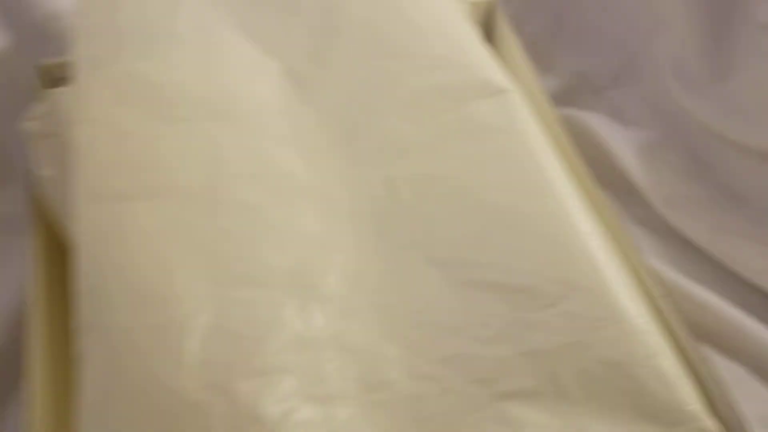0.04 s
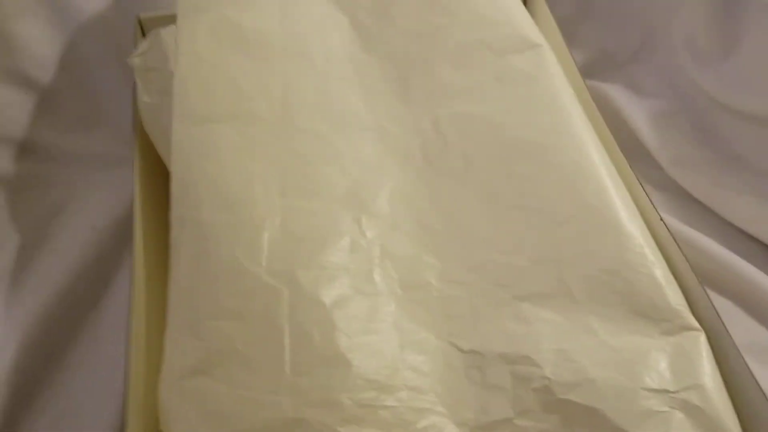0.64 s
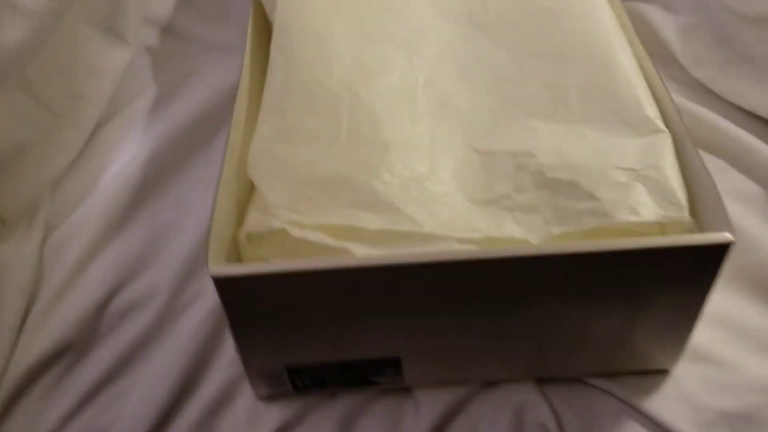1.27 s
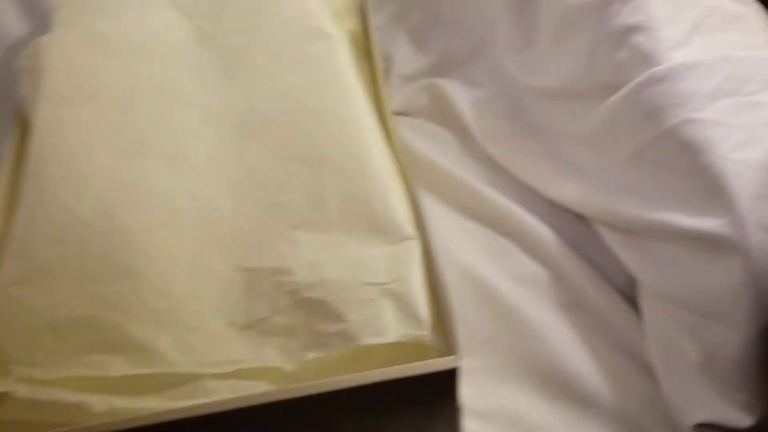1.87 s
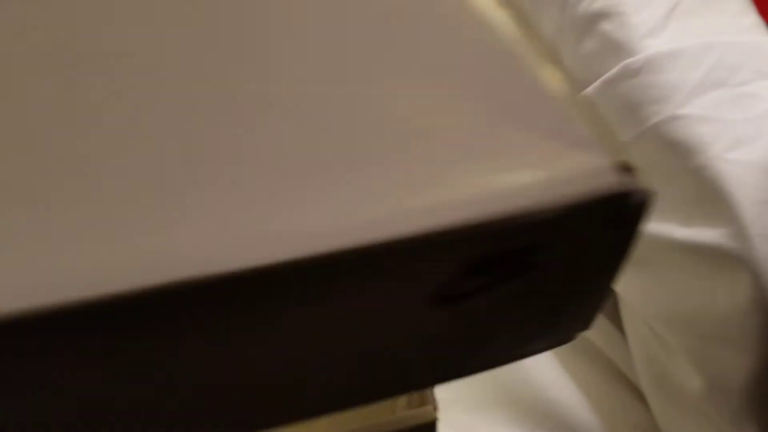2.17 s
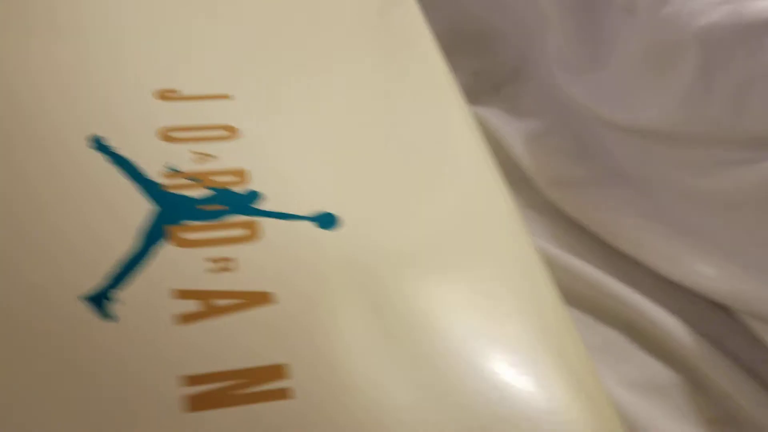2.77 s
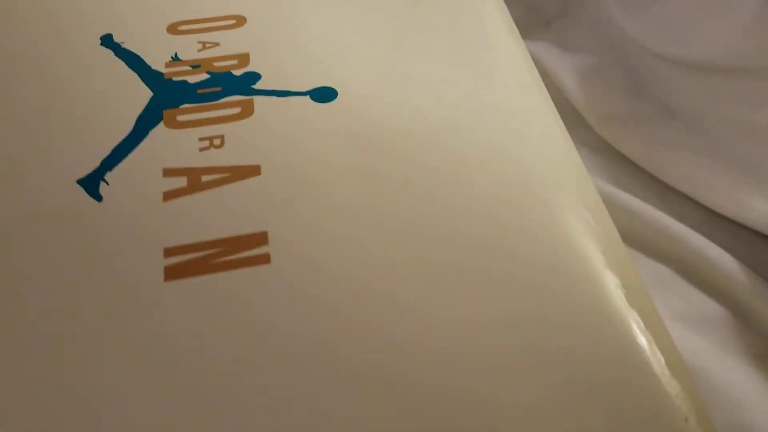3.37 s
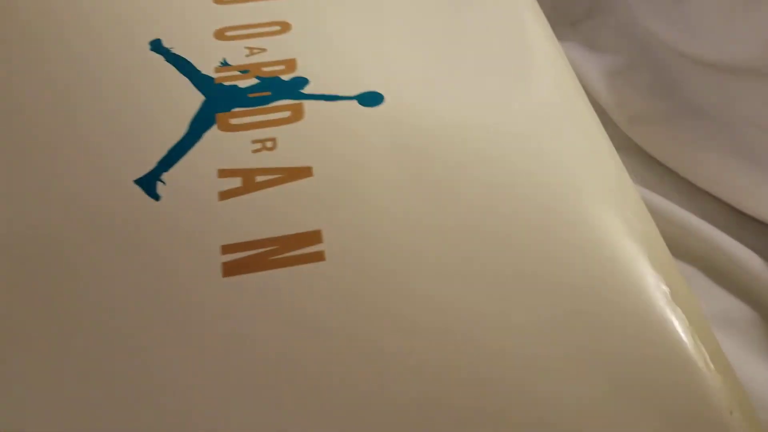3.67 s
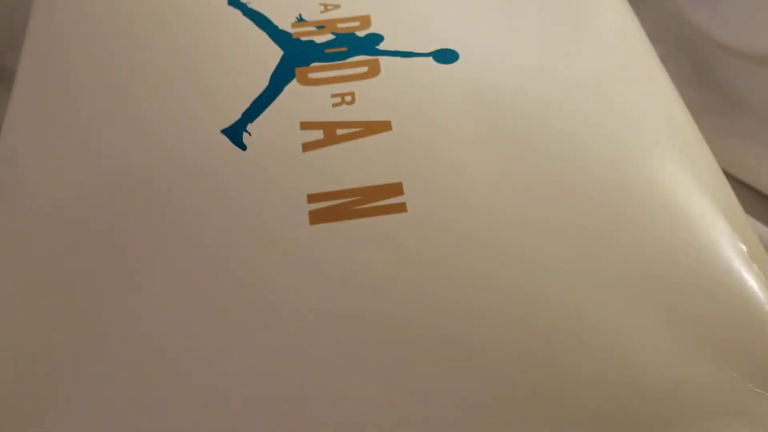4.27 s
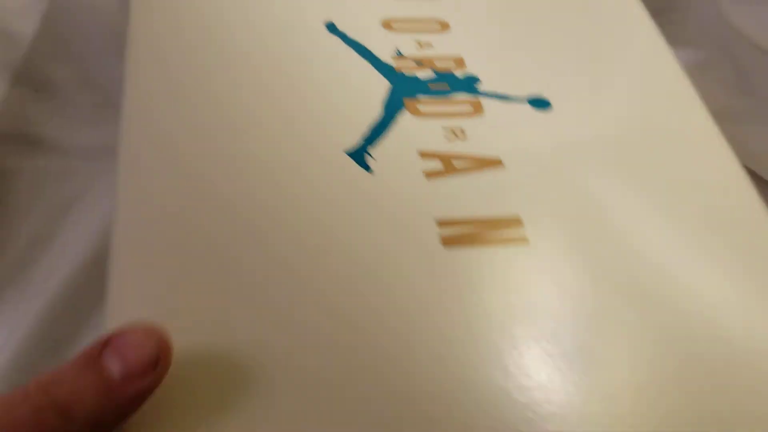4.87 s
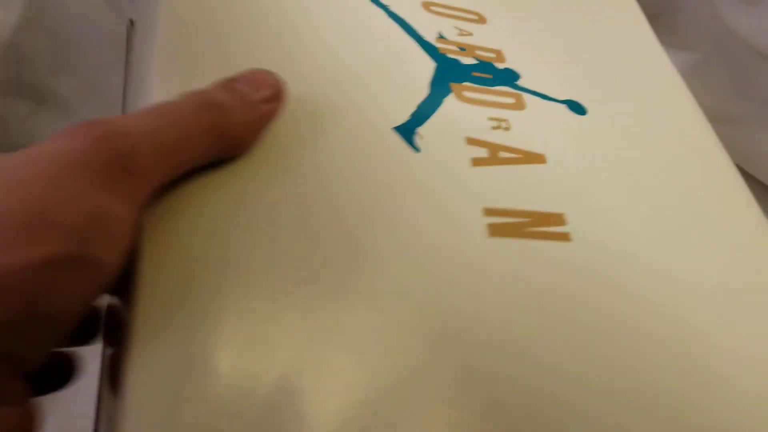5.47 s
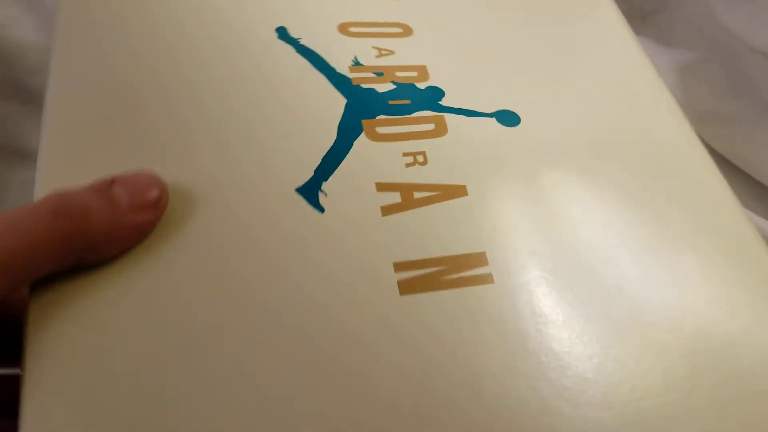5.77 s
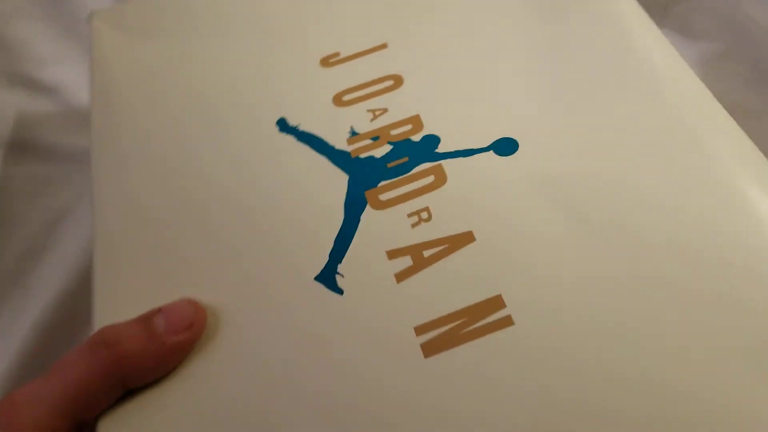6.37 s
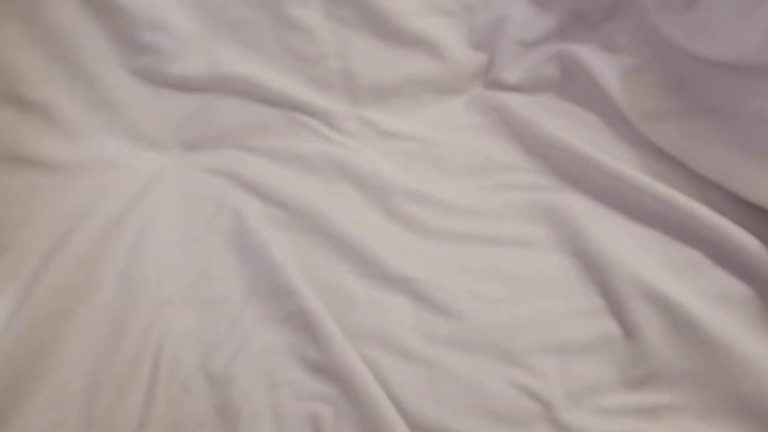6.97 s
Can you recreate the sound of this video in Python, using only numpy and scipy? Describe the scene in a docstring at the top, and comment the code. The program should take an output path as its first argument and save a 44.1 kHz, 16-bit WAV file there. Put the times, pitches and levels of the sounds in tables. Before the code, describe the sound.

For the first two seconds or so, tissue paper ticks and crinkles lightly inside a cardboard shoebox, with small gaps between the crackles. At about 1.9 seconds the lid swings shut with a bright, briefly ringing clack, a weaker second one and low bumps. From 2.3 to 2.9 seconds the lid scrapes over the rim and is pressed home with a cluster of taps and crisp snaps. A hand then slides over the card in short, uneven, hissing strokes, shifting the box with soft bumps. A strong hollow knock lands at 4.5 seconds, with further knocks around 4.9, 5.8 and 6 seconds. The loudest, a quick clatter of knocks, comes at 6.5 seconds, followed by a duller thump and fading rubbing until about 7 seconds. Everything is close to the microphone in a small, soft bedroom with faint steady room noise and hardly any echo.

```python
"""A cardboard box is shut and handled on a bed, close to a hand-held phone.
Tissue paper ticks and crinkles inside as its creases buckle. The lid swings shut with a ringing clack,
scrapes over the rim and is pressed home. A hand slides over the card in stick and slip, shifts the box
and knocks it about, ringing its panels. A small, soft bedroom answers briefly."""
import sys
import numpy as np
from scipy import signal
from scipy.fft import rfft, irfft
from scipy.io import wavfile
from scipy.ndimage import map_coordinates

SR = 44100
rng = np.random.default_rng(int(sys.argv[2]) if len(sys.argv) > 2 else 0)


def transcribe(signal):
    """Save signal, clipped to [-1, 1], as a 16-bit WAV file at the path in sys.argv[1]."""
    frames = np.atleast_2d(signal).T
    limited = np.clip(frames, -1, 1)
    pcm = np.round(limited * 32767).astype(np.int16)
    wavfile.write(sys.argv[1], SR, pcm)


N = 313992
TIME = np.arange(N) / SR
FREQ = np.fft.rfftfreq(N, 1 / SR)


def undb(db):
    """Decibels to gain."""
    return 10 ** (np.asarray(db) / 20)


def unit(x):
    """Scale to rms 1."""
    return x / np.sqrt(np.mean(x ** 2))


def along(hz, curve):
    """Read an EQ curve of (freq_hz, gain_db) points on a log-frequency axis."""
    freq_hz, gain_db = np.transpose(curve)
    return np.interp(np.log(np.maximum(hz, 1)), np.log(freq_hz), gain_db)


def colour(x, curve):
    """Shape a sound with an EQ curve."""
    return irfft(rfft(x) * undb(along(FREQ, curve)), N)


def band(x, lo_hz, hi_hz):
    """Causal band-pass."""
    return signal.sosfilt(signal.butter(3, [lo_hz, hi_hz], "band", fs=SR, output="sos"), x)


def walk(rate_hz):
    """Smooth random modulation at rms 1."""
    knots = rng.standard_normal(N // 20)
    return unit(np.interp(TIME * rate_hz, np.arange(len(knots)), knots))


def add(out, start_s, sound):
    """Mix a short sound in at start_s."""
    i = max(int(start_s * SR), 0)
    out[:, i:i + sound.shape[-1]] += sound[..., :N - i]


def port_noise(split_hz=1100, alike=0.95):
    """Noise at the two microphone ports: alike for long waves, unrelated for short ones."""
    shared = alike / (1 + (FREQ / split_hz) ** 6)
    noise = rfft(rng.standard_normal((3, N)))
    return irfft(noise[0] * np.sqrt(shared) + noise[1:] * np.sqrt(1 - shared), N)


def stroke(start_s, length_s, attack_s=0.039, release_s=0.045, arch_db=3):
    """One slide gathers speed, is strongest in the middle and coasts to rest."""
    age = TIME - start_s
    attack = np.clip(age / attack_s, 0, 1)
    arch = undb(arch_db * (np.sin(np.pi * np.clip(age / length_s, 0, 1)) - 1))
    release = np.exp(-np.clip(age - length_s, 0, 1) / release_s)
    return attack * arch * release


# slides of card and skin: start_s, length_s, level_db, weight_db, brightness_db
STROKES = [(-0.034, 0.048, -60, -14, 7.5), (0.504, 0.066, -60.5, 1, -18), (0.714, 0.028, -56, -9, -10),
           (0.74, 0.17, -77.5, -31, 7), (1.874, 0.2, -54, -7, -5.5), (2.291, 0.081, -67, -4.5, 7),
           (2.387, 0.17, -35, 3, -4), (2.57, 0.14, -48.5, -19, -3.5), (2.69, 0.17, -46, -1.5, -5.5),
           (2.856, 0.19, -59, 3, -7), (2.998, 0.043, -49, 5, -7), (3.073, 0.17, -47.5, 1.5, -6),
           (3.215, 0.21, -56, 7, -9), (3.408, 0.14, -45.5, 4, -4), (3.566, 0.072, -57.0, 9.5, -1.5),
           (3.678, 0.043, -53.5, 0.5, -8), (3.772, 0.26, -52.5, 3, 0), (3.918, 0.102, -41, -0.5, -6),
           (4.036, 0.13, -54.0, -2, 0), (4.196, 0.031, -51, -4, -1.5), (4.414, 0.17, -44, -2, -14),
           (4.619, 0.119, -52.5, 6, -6), (4.677, 0.15, -47, -3.5, -3.5), (4.765, 0.12, -40, -10, -6),
           (4.972, 0.039, -54.5, 13.5, -0.5), (5.089, 0.16, -35.5, -5, -13), (5.259, 0.11, -36, -0.5, -7),
           (5.357, 0.086, -42, -6, -1.5), (5.488, 0.095, -48.5, -16, -7), (5.53, 0.12, -46.5, 1, -11.5),
           (5.635, 0.18, -44, -6.5, -4.5), (5.832, 0.08, -43, 0, -6), (5.955, 0.1, -42, 0, -3),
           (6.081, 0.16, -59.5, -2, 1.5), (6.258, 0.17, -43.5, -1, -7), (6.472, 0.1, -46.5, -3, -2),
           (6.638, 0.064, -44.5, -3.5, -6), (6.788, 0.13, -58.5, 6.5, -10),
           (6.937, 0.08, -55.5, -1.5, -4.5)]


def hand_drive(resting_db=(-61, -63, -70)):
    """How hard the slides and the resting hand drive flex, scrape and hiss, in that order."""
    # the hand on the closed box never lies quite still
    power = np.outer(undb(resting_db), stroke(start_s=2.36, length_s=5.34)) ** 2
    for start_s, length_s, level, weight, brightness in STROKES:
        gains = undb([level + weight, level, level + brightness])
        power += np.outer(gains, stroke(start_s, length_s)) ** 2
    return np.sqrt(power)


# EQ curves of flexing panels, scraping edge and hissing fibres: freq_hz, gain_db
FLEX_EQ = [(18, -34), (30, -11.5), (54, -1.5), (145, -12), (184, 1.5), (264, -11), (303, -6), (355, -8.5),
           (411, -15), (450, -26), (580, -63), (990, -120)]
SCRAPE_EQ = [(220, -33), (380, 5), (410, -31.5), (480, -3), (558, -1), (806, -6.5), (1180, -7.5),
             (1430, -8), (2800, -18), (3640, -49.5), (6160, -120)]
HISS_EQ = [(1350, -2), (2300, -4), (2900, -8), (3710, -5), (4380, -7.5), (4750, -8), (7600, -7.5),
           (9260, -11), (12700, -9.5), (15700, -16), (16100, -28), (16500, -52)]


def friction(scrape_db=-4.5, hiss_db=0.5, slip_db=1.42, grain_db=1.0, catch_db=8.0, catches_per_s=35):
    """Uneven stick and slip: the panels flex, the edge scrapes and the fibres hiss in tiny grains."""
    # now and then a fibre catches and lets go in about two milliseconds
    snags = (rng.random(N) < catches_per_s / SR) * rng.random(N)
    catches = signal.lfilter([1], [1, -np.exp(-1 / (0.0022 * SR))], snags)
    slips = undb(slip_db * walk(90) + grain_db * walk(1100)) + undb(catch_db) * catches
    out = np.zeros((2, N))
    for drive, curve, trim in zip(hand_drive(), (FLEX_EQ, SCRAPE_EQ, HISS_EQ), (0, scrape_db, hiss_db)):
        out += unit(colour(port_noise() * slips, curve)) * drive * undb(trim)
    return out


def travel(x, patchy_db=2.0, rate_hz=22, per_octave=5):
    """As the contact moves over the panel, different regions of the spectrum come and go."""
    hz, frame_s, cells = signal.stft(x, SR, nperseg=512)
    places = np.meshgrid(per_octave * np.log2(1 + hz / 400), rate_hz * frame_s, indexing="ij")
    patches = map_coordinates(rng.standard_normal(size=(40, 300)), places, order=3, mode="wrap")
    return signal.istft(cells * undb(patchy_db * patches), SR)[1][:, :N]


# EQ curve of the quiet bedroom: freq_hz, gain_db
ROOM_TONE_EQ = [(15, -30), (25, 0), (105, 0), (212, -14), (416, -22), (840, -22), (1790, -17), (2160, -18),
                (3160, -27), (7510, -27), (9320, -30), (12500, -23), (16000, -29)]


def room_tone(level_db=-68):
    """A faint, steady rumble and hiss under everything."""
    return undb(level_db) * unit(colour(port_noise(), ROOM_TONE_EQ))


# paper creases and card edges snapping: start_s, level_db, brightness_db
SNAPS = [(0.012, -47.5, 2), (0.0373, -40.5, -11), (0.063, -61.5, 0), (0.0902, -50.5, 3),
         (0.122, -46.5, -31), (0.1637, -45.5, -5.5), (0.201, -46, -31), (0.298, -62, -10),
         (0.428, -64.5, 0.5), (0.478, -53, -7.5), (0.4943, -45, 3), (0.538, -52, -12), (0.581, -43.5, 1.5),
         (0.726, -58, -7.5), (0.8224, -48, -4.5), (0.94, -58, -2.5), (1.472, -59.5, 5), (1.5456, -50, 2),
         (1.5589, -42, -1.5), (1.76, -54.5, 3.5), (1.8845, -40.5, -6), (1.89, -39, -14.5), (2.098, -56, -6),
         (2.144, -61, -2), (2.3542, -35.5, -11.5), (2.421, -33, -7.5), (2.427, -37.5, 0.5),
         (2.456, -33.5, -2.5), (2.519, -30, -9.5), (2.762, -35.5, -8), (2.769, -35, 0.5), (2.776, -42, -8),
         (2.789, -51, -14), (2.8732, -45, 7), (3.323, -49.5, 1.5), (3.381, -49, 2), (3.512, -47.5, 3.5),
         (3.785, -45.5, -3), (3.994, -32.5, -12), (4.016, -50.5, 8.5), (4.033, -44, 4.5),
         (4.385, -48.5, -2), (4.509, -42.5, 0), (4.7965, -36, 1), (4.863, -29.5, -36), (5.016, -43, -1.5),
         (5.084, -53.5, -7), (5.193, -40.5, -2.5), (5.337, -48, 3.5), (5.632, -45.5, -3.5),
         (5.738, -44.5, 2), (5.848, -42, -9), (6.033, -28.5, -7.5), (6.394, -42.5, -1), (6.621, -42, -5),
         (6.635, -39, -2.5), (6.744, -42.5, -4), (6.931, -53.5, -5)]


def snaps(clicks, rise_s=0.00092, fade_s=0.0033, tail_db=-16, tail_s=0.021, fizz_slope=1.48):
    """Creases buckle in tiny bursts that echo briefly in the box; the card's clicks share this voice."""
    out, t = np.zeros((2, N)), TIME[:SR // 8]
    noise = port_noise()
    body = unit(band(noise, 726, 2050)) * undb(5)
    crisp = unit(band(noise, 2770, 6750)) * undb(5)
    fizz = unit(band(noise, 8000, 14100)) * undb(2)
    decay = np.exp(-t / fade_s) + undb(tail_db) * np.exp(-t / tail_s)
    envelope = (1 - np.exp(-t / rise_s)) * decay
    for start_s, level, brightness in list(SNAPS) + clicks:
        i = int(start_s * SR)
        gains = undb([level, level + brightness, level + fizz_slope * brightness])
        burst = sum(gain * part[:, i:i + len(t)] for gain, part in zip(gains, (body, crisp, fizz)))
        add(out, start_s, burst * envelope[:burst.shape[1]])
    return out


# modes of the box before the hand damps it: pitch_hz, level_db, t60_s
BOX_MODES = [(55.2, -2.5, 0.26), (83.8, -7.5, 0.37), (113.2, 5, 0.11), (153.8, 5, 0.1), (198.3, 1, 0.18),
             (242, -3, 0.15), (304.6, -2.5, 0.15), (336.2, 3.5, 0.088), (417, 0, 0.04), (481, -3, 0.097),
             (575.6, 2.5, 0.063), (653, 0, 0.072), (760, -32, 0.038), (857.5, -5, 0.096), (1030, -3, 0.062),
             (1090, -12, 0.07), (1217, -2.5, 0.03), (1480, 0, 0.022), (1760, -17, 0.051), (1940, -6, 0.016)]
# blows on the box: start_s, level_db, weight_db, hardness_db
KNOCKS = [(0.121, -69.5, 16, 10), (0.495, -63.5, 5, 12.5), (1.559, -60.5, -19, 12),
          (1.893, -39.5, 10.5, -5.5), (1.945, -40.5, 15.5, -6), (2.009, -44, 5.5, -7.5),
          (2.368, -23.5, -14.5, 0.5), (2.425, -30.5, -14, -12), (2.476, -30.5, -9, -7),
          (2.522, -30, -14, 1.5), (2.546, -37, -6, 1.5), (2.612, -40, -1, -4.5), (3.105, -41, -14, -5),
          (3.138, -48.5, 11, 3), (3.228, -39.5, 5, -6), (3.469, -35, -7, -2.5), (3.543, -56.5, 21.5, -7),
          (3.587, -45, 3, -19), (3.784, -43.5, -9, -1), (3.937, -46, 19, -2), (3.9933, -31.5, -22, 0),
          (4.445, -41.5, -10, -11), (4.5082, -17.5, -4, -6), (4.8628, -29, -4, 2.5),
          (4.884, -28.5, -3.5, -6.5), (5.234, -31.5, -8, -13), (5.298, -41.5, 3, -2), (5.408, -45.5, 7, -3),
          (5.457, -43.5, -9, 11), (5.78, -25.5, 1, -6.5), (5.859, -33.5, 6, -3), (6.024, -27, 1, -10),
          (6.038, -32.5, -2, -18), (6.277, -46, 10, -13), (6.458, -13, -6.5, -2), (6.473, -17, -6, -8.5),
          (6.48, -14, -5.5, -11), (6.621, -30.5, 8.5, -2.5), (6.641, -36, 11.5, -3), (7.061, -53, 16, -22)]


def knocks(spot_db=1.5, detune=0.012, ring_share=0.78, contact_s=0.00062, crush_db=-6, crush_s=0.012):
    """Each blow rings the box; its place and softness decide which modes answer."""
    out, t = np.zeros((2, N)), TIME[:SR // 3]
    hz, mode_db, t60_s = np.transpose(BOX_MODES)
    damping = np.log(1000) / (t60_s * ring_share)  # hand and bed shorten the ring
    crush = unit(band(port_noise(), 397, 1300))
    chance = rng.standard_normal((len(KNOCKS), 4, len(BOX_MODES)))
    for (start_s, level, weight, hardness), (spot, bend, phase, spread) in zip(KNOCKS, chance):
        boom_db, tock_db = level + weight, level + hardness
        blow_eq = [(130, boom_db), (190, level + 2), (380, level + 2), (500, tock_db + 1)]
        ring_db = mode_db + spot_db * spot + along(hz, blow_eq)
        bent_hz = hz * (1 + detune * bend)  # the grip bends the modes
        waves = np.exp(np.outer(2j * np.pi * bent_hz - damping, t))
        # the highest modes and the deepest boom reach the two ports out of step
        apart = np.outer([1, -1], spread * ((hz / 1300) ** 2 + 25 / hz))
        gains = undb(ring_db) * np.exp(1j * (phase + apart))
        ring = np.imag(gains @ waves)
        # fibres give way briefly under the blow
        fibres = np.roll(crush, -int(start_s * SR), axis=1)[:, :len(t)]
        crunch = fibres * undb(tock_db + crush_db) * np.exp(-t / crush_s)
        # a dull, boomy blow comes from a softer and longer push
        push_s = contact_s * np.clip(undb(max(boom_db, level) - tock_db), 0.5, 5)
        add(out, start_s, (ring + crunch) * (1 - np.exp(-t / push_s)))
    return out


def card_clicks(trim_db=-14.5, brightness_db=-8.5):
    """Cues for snaps(): the card clicks under each blow, louder the harder it is."""
    return [(start_s, level + hardness + trim_db, brightness_db) for start_s, level, _, hardness in KNOCKS]


# modes of the free lid (low) and what it strikes (high), before shortening: pitch_hz, level_db, t60_s
CLACK_MODES = [(98, 4.5, 0.48), (235.4, 9, 0.25), (325, -9, 0.1), (456, -0.5, 0.23), (2296, 6, 0.099),
               (2294, 3, 0.16), (2450, 2, 0.13), (2890, -10, 0.21), (3402, -13, 0.2), (4280, -10, 0.15),
               (4640, -14, 0.19), (5760, -10, 0.15), (6020, -13, 0.15), (6150, -8, .18), (6750, -11, .18),
               (6930, -13, 0.11), (7200, -14, .16), (8366, -22, 0.13), (8900, -7, 0.15), (9700, -10, 0.17),
               (12500, -8, .11), (13610, -6, 0.13)]
# the swinging lid strikes something hard: start_s, level_db
CLACKS = [(1.9423, -29.5), (2.008, -40.5)]


def lid_clacks(ring_db=-9, ring_share=0.85, crack_db=-1, crack_s=0.013, shiver_db=-9, shiver_s=0.027):
    """A hard contact: a bright crack, a short tinny ring and a dense, high shiver."""
    out, t = np.zeros((2, N)), TIME[:SR // 2]
    hz, mode_db, t60_s = np.transpose(CLACK_MODES)
    damping = np.log(1000) / (t60_s * ring_share)
    waves = np.exp(np.outer(2j * np.pi * hz - damping, t))
    for start_s, level in CLACKS:
        gains = undb(mode_db + ring_db) * np.exp(2j * np.pi * rng.random((2, len(hz))))
        ring = np.imag(gains @ waves)
        noise = rng.standard_normal((2, len(t)))
        crack = undb(crack_db) * unit(band(noise, 1400, 9100)) * np.exp(-t / crack_s)
        shiver = undb(shiver_db) * unit(band(noise, 5300, 6840)) * np.exp(-t / shiver_s)
        add(out, start_s, undb(level) * (ring + crack + shiver))
    return out


# fingertips skim the glossy coating: peak_s, half_length_s, level_db
SKIMS = [(2.493, 0.074, -51), (2.776, 0.018, -38), (3.85, 0.017, -51), (4.805, 0.04, -50),
         (5.155, 0.043, -56), (5.385, 0.067, -47), (5.936, 0.079, -53)]


def finger_skims(lo_hz=11000, hi_hz=15000):
    """Dry skin on gloss makes a fine, airy hiss that swells and fades with each pass."""
    swells = sum(undb(level) * np.exp(-((TIME - peak_s) / half_s) ** 2) for peak_s, half_s, level in SKIMS)
    return swells * unit(band(port_noise(), lo_hz, hi_hz))


def bedroom(dry, wet_db=-14, t60_s=0.19, build_s=0.004):
    """Soft furnishings leave only a short, weak tail."""
    t = TIME[:SR // 2]
    envelope = np.exp(-np.log(1000) * t / t60_s) * (1 - np.exp(-(t / build_s) ** 2))
    tail = unit(port_noise()[:, :len(t)] * envelope) / np.sqrt(len(t))
    return dry + undb(wet_db) * signal.fftconvolve(dry, tail, axes=1)[:, :N]


# stereo balance at the microphone ports: freq_hz, left_minus_right_db
BALANCE = [(100, 0), (300, .5), (700, -1), (1500, -4.5), (3000, -2), (6000, -2.5), (10000, -5.3),
           (15000, -4.5)]


def phone_ports(x, right_lag_s=0.00013):
    """The left port hears the box a little earlier, the right one brighter."""
    lag = np.exp(-2j * np.pi * np.outer([0, right_lag_s], FREQ))
    tilt = undb(np.outer([0.5, -0.5], along(FREQ, BALANCE)))
    return irfft(rfft(x) * tilt * lag, N)


def scene():
    """Paper, box and hand in the bedroom, over its room tone."""
    handling = snaps(card_clicks()) + knocks() + lid_clacks() + travel(friction()) + finger_skims()
    return phone_ports(bedroom(handling)) + room_tone()


def record(dry, low_cut_hz=42, high_cut_hz=16000):
    """The phone drops the deepest bass, clips at full scale and cuts the top."""
    low_cut = signal.butter(4, low_cut_hz, "high", fs=SR, output="sos")
    high_cut = signal.ellip(8, 0.2, 70, high_cut_hz, fs=SR, output="sos")
    clipped = np.clip(signal.sosfilt(low_cut, dry), -1, 1)
    return signal.sosfilt(high_cut, clipped)


dry = scene()
out = record(dry)
transcribe(out)
```